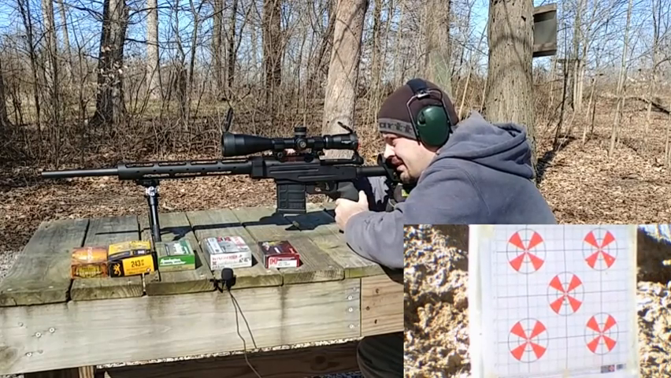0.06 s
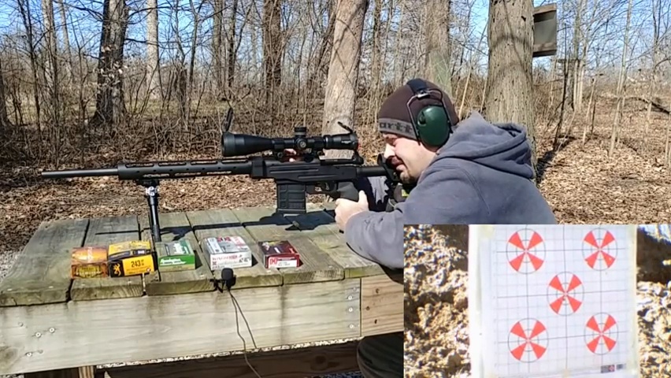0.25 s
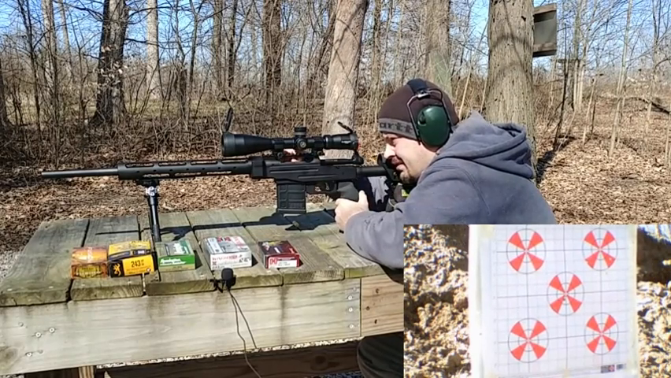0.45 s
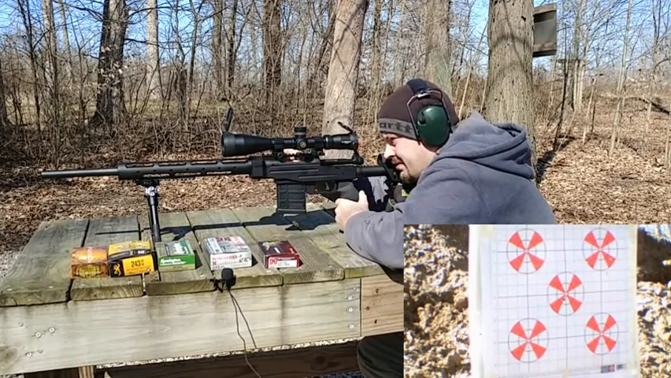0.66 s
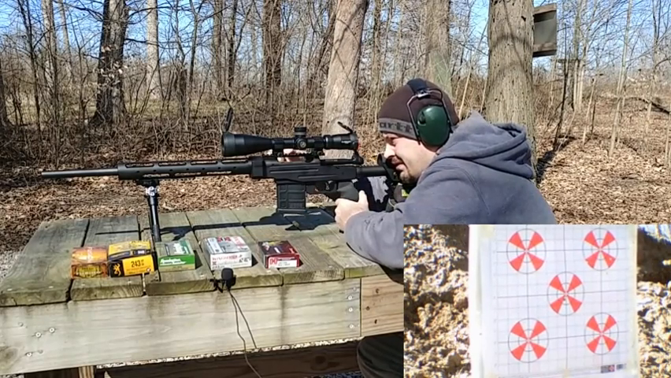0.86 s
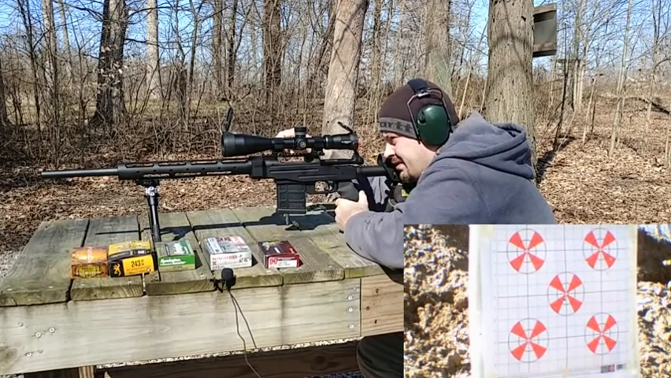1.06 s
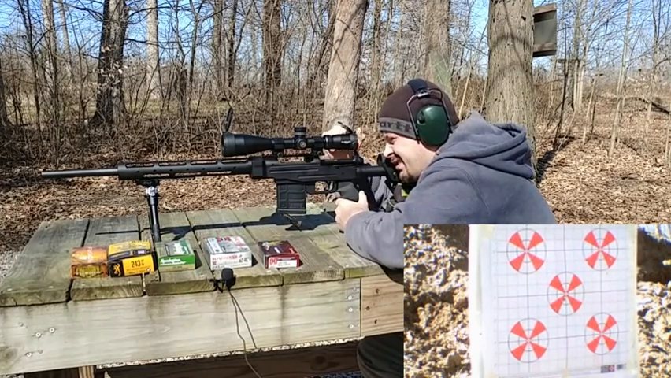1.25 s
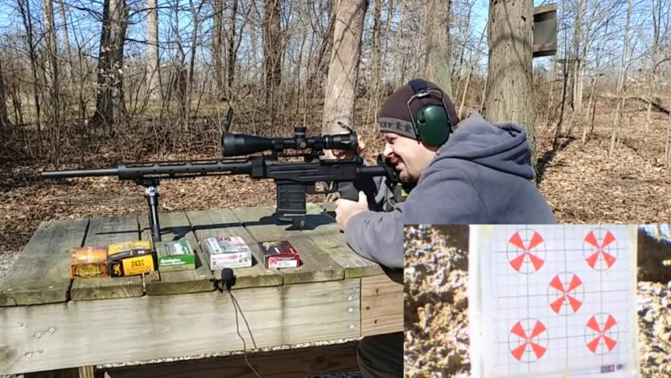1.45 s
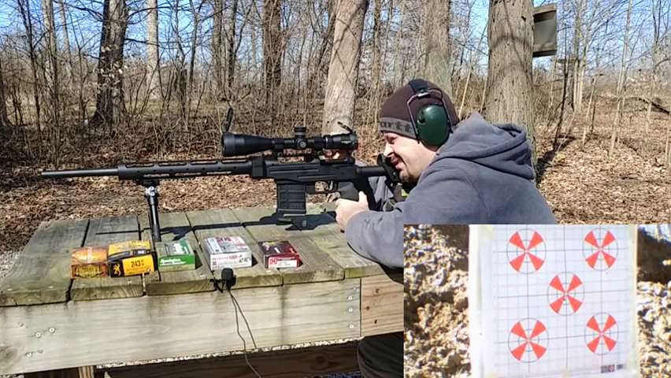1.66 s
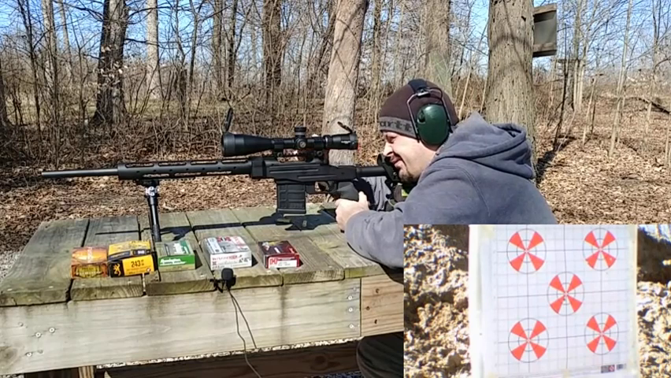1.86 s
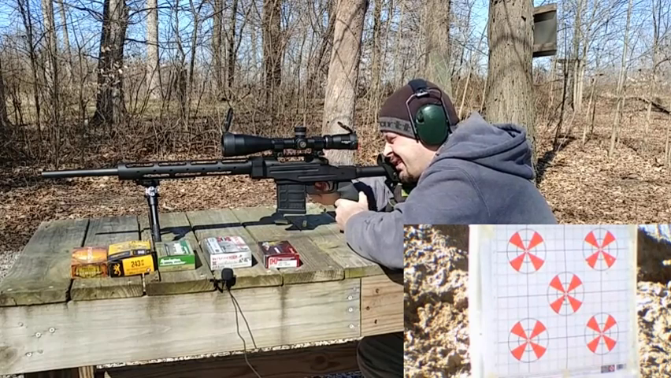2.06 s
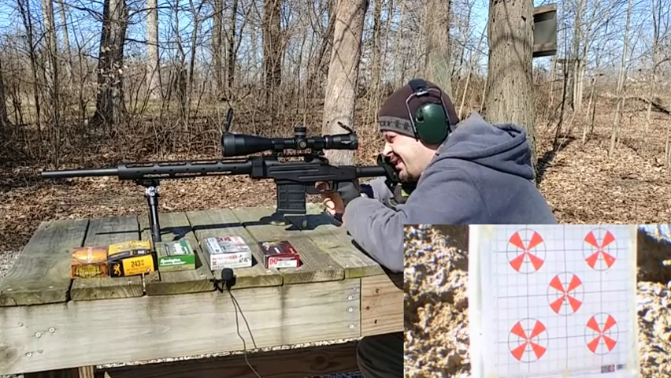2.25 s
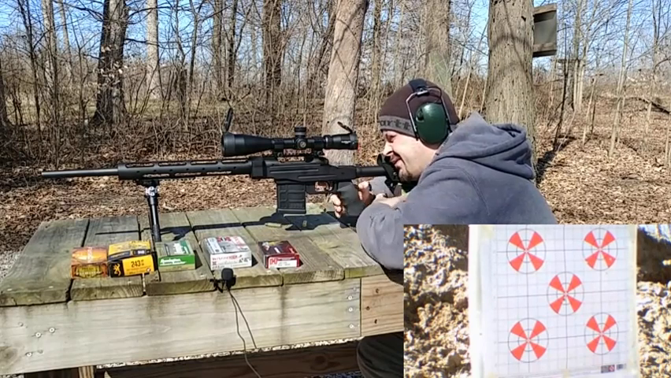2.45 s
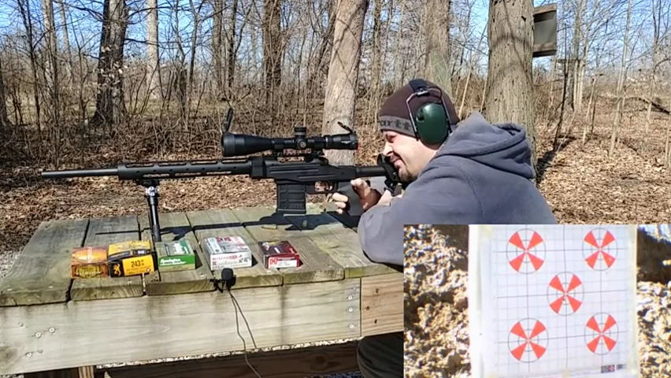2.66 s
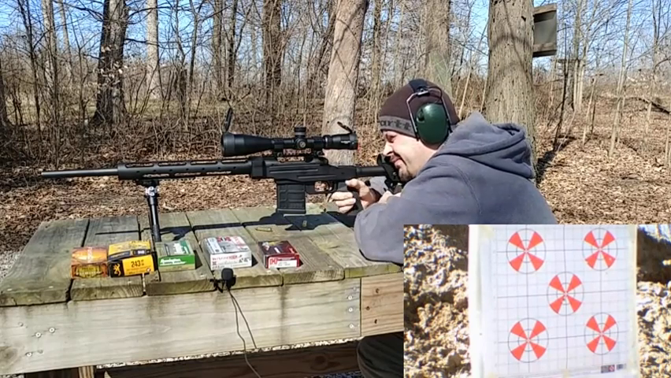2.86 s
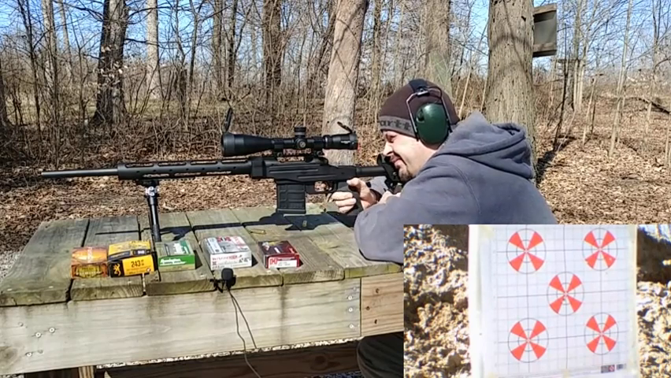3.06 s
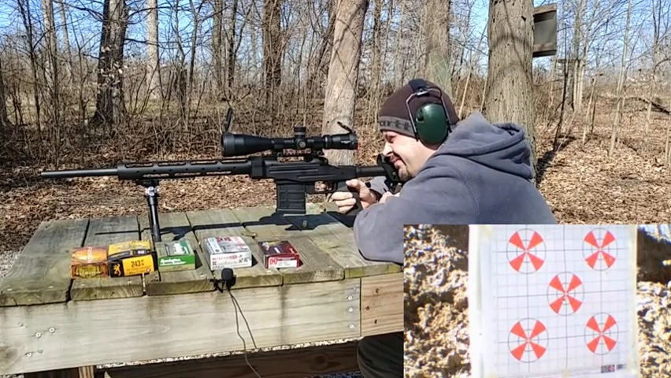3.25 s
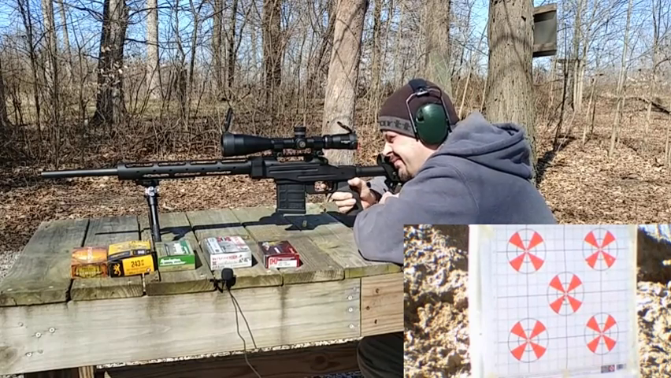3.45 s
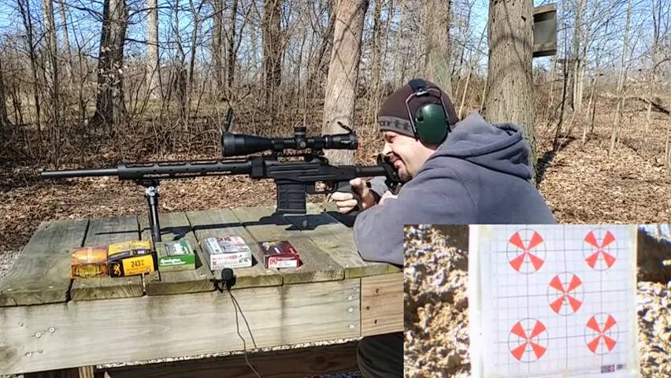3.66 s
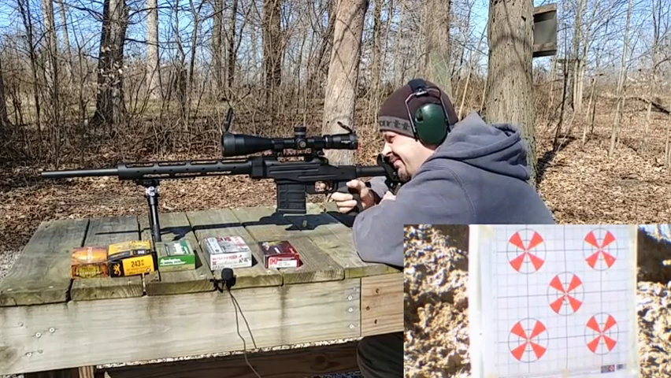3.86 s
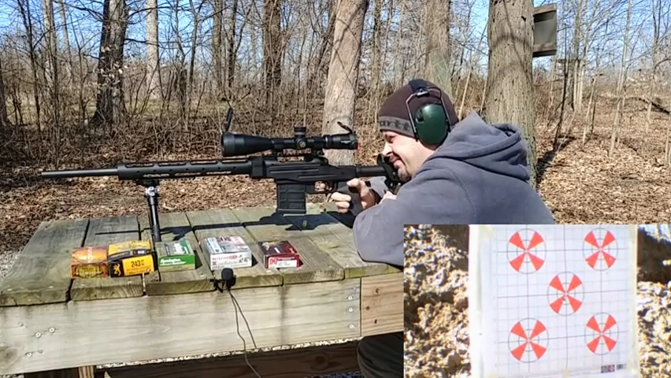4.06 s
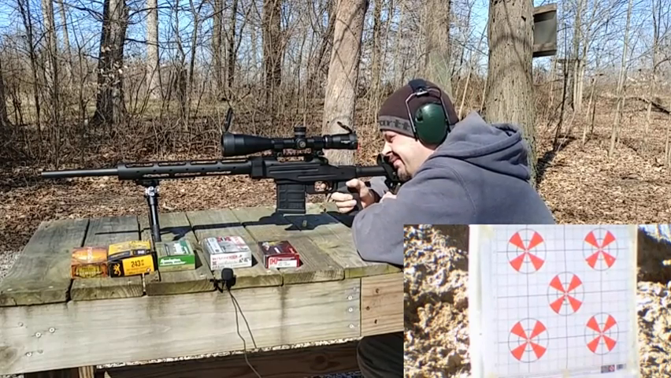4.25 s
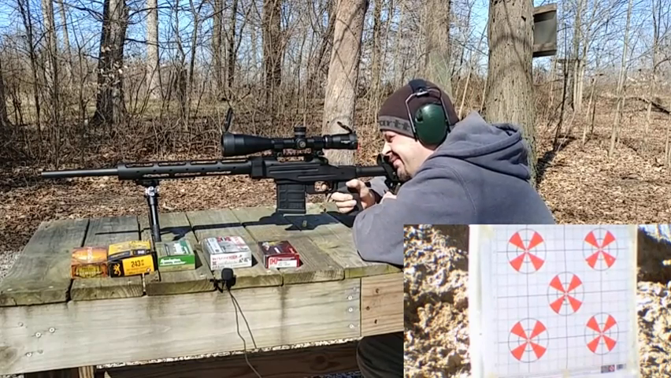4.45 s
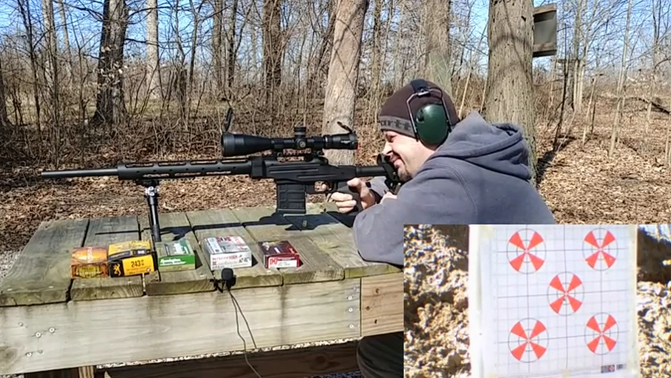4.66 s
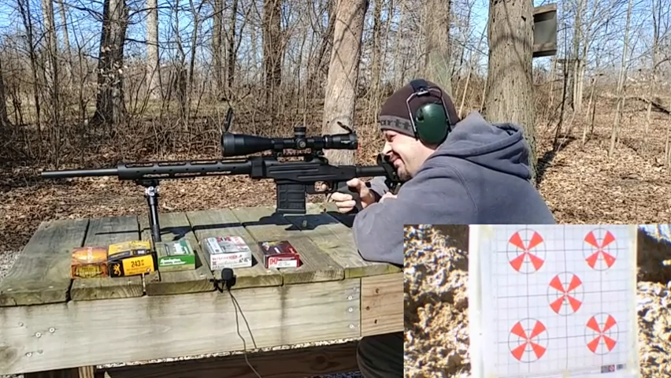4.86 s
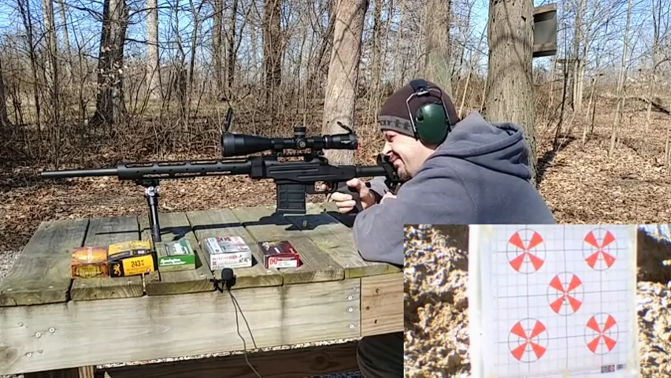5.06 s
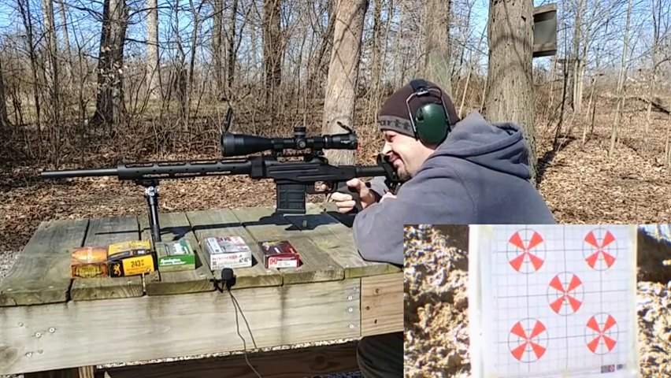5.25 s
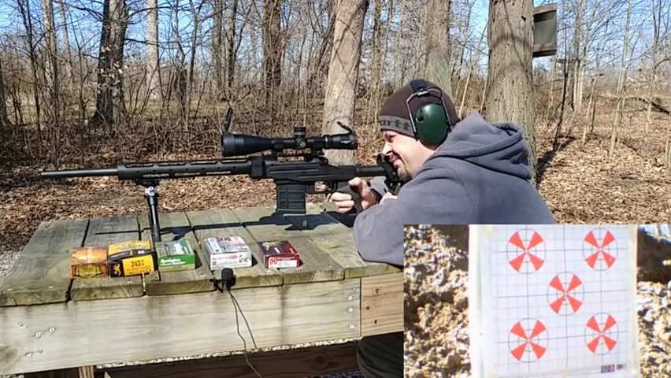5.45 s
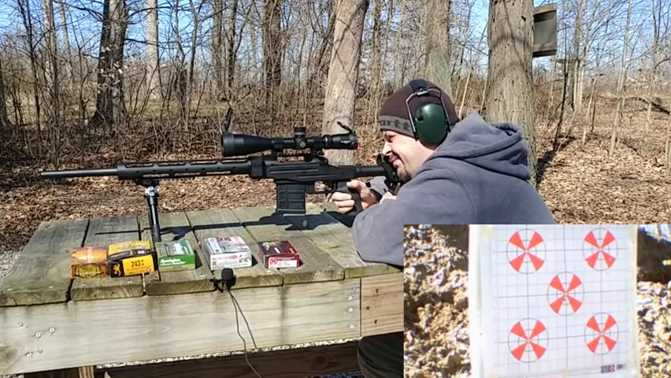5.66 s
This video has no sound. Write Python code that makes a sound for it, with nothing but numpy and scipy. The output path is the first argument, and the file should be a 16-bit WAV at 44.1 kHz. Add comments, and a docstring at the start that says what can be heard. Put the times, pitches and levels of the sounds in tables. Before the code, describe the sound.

Quiet open woods with a low, wavering far engine rumble and very soft air. Tiny metallic ticks occur at the start and around 0.4-0.6 s. At about 0.83 s the rifle bolt clicks open. At 1.1 s an ejected case strikes the wooden bench with a loud hard knock and a brief, very high brass ring, alongside a scrape and low thump; it bounces again at 1.17 and strongly at 1.28 s, then skids and patters away until 1.55 s. From 1.73 to 1.85 s a rapid cluster of bright steel clacks and scraping pushes a round in, followed by light clicks near 1.98 s and a loud, crisp locking snap at 2.07 s. Short bench and shelter reflections and a faint woodland tail follow. Very faint frog trills come at 2.2 and 3.9 s. Soft, dull stock bumps and light rubbing occur from 3 to 4.8 s, strongest near the end, before the rumble continues alone.

```python
"""A rifle bolt is worked at a wooden shooting bench in quiet woods: noisy bursts ring steel resonances.
The bolt clicks open, the spent case bounces on the planks, a round scrapes in and the handle snaps down.
The case adds wooden knocks, rubbing noise and thin brass tones; the rifle then settles with soft knocks.
Low noise and wavering tones make a far engine and bench boom, under open air; a faint frog trills twice.
Fading noise tails give the echoes of the bench, the shelter and the trees."""
import sys
import numpy as np
from scipy import signal
from scipy.fft import rfft, irfft, next_fast_len
from scipy.io import wavfile

SR = 44100
rng = np.random.default_rng(int(sys.argv[2]) if len(sys.argv) > 2 else 0)


def to_wav(sig):
    """Store sig (one row per channel, or 1-D mono) as 16-bit WAV at the path in sys.argv[1].

    Samples outside -1..1 are clipped; the rate is SR.
    """
    pcm = np.clip(np.atleast_2d(sig), -1, 1) * 32767
    pcm = np.round(pcm).astype(np.int16)
    wavfile.write(sys.argv[1], SR, pcm.T)  # frames by channels


N = 251722
TIME = np.arange(N) / SR
BODY_TIME = TIME[:SR // 8]  # length of one blow


def from_db(db):
    """Turn decibels into gain."""
    return 10 ** (np.asarray(db) / 20)


def rms_one(x):
    """Scale a sound to unit power."""
    return x / np.sqrt(np.mean(x ** 2) + 1e-30)


def at_hz(points, hz):
    """Read a table between its points, with pitch spaced as the ear hears it (log scale)."""
    point_hz, value = np.transpose(points)
    return np.interp(np.log(np.maximum(hz, 1)), np.log(point_hz), value)


def colour(x, spectrum):
    """Filter to the given dB spectrum, with the response as early as possible (minimum phase)."""
    size = 2 * next_fast_len(x.shape[-1] // 2 + 2048)
    level_db = at_hz(spectrum, np.fft.rfftfreq(size, 1 / SR))
    # folding the cepstrum forward in time puts the filter's energy first
    cepstrum = irfft(np.log(from_db(level_db)))
    cepstrum[1:size // 2] *= 2
    cepstrum[size // 2 + 1:] = 0
    response = np.exp(rfft(cepstrum))
    return irfft(rfft(x, size) * response)[..., :x.shape[-1]]


# how alike left and right are, for close sounds and for open air: pitch_hz, likeness (1 = identical)
NEAR_LIKENESS = [(100, .97), (900, .95), (2000, .85), (3500, .65), (5200, .05), (14000, 0)]
AIR_LIKENESS = [(60, .93), (250, 0.69), (800, 0.41), (2500, 0.085), (12000, 0.02)]


def stereo_noise(size, likeness):
    """White noise whose two sides are alike in the bass and unrelated in the treble."""
    mid, side = rfft(rng.standard_normal((2, size)))
    alike = np.clip(at_hz(likeness, np.fft.rfftfreq(size, 1 / SR)), -1, 1)
    shared = np.sqrt((1 + alike) / 2) * mid
    opposed = np.sqrt((1 - alike) / 2) * side * [[1], [-1]]
    return irfft(shared + opposed, size)


def drift(rate):
    """A random wander of spread 1 at its turning points, with a new point rate times a second."""
    return np.interp(TIME * rate, np.arange(SR), rng.standard_normal(SR))


def add(out, start_s, sound):
    """Mix a sound in at its start time."""
    start = max(round(start_s * SR), 0)
    out[:, start:start + sound.shape[-1]] += sound[:, :N - start]


def body(modes, spectrum, direct_db):
    """How an object answers a tap: damped resonances plus the dry crack of the contact."""
    click = signal.unit_impulse(len(BODY_TIME))
    out = from_db(direct_db) * click
    for hz, width_hz, db in modes:
        r = np.exp(-np.pi * max(width_hz, 45) / SR)  # a wider resonance dies sooner
        resonator = [1, -2 * r * np.cos(2 * np.pi * hz / SR), r * r]
        ring = signal.lfilter([1, 0, -1], resonator, click)
        out = out + from_db(db) * (1 - r * r) / 2 * ring
    return colour(out, spectrum)[None]


def blows(rows, edges, band_db, response, knee_hz, strike_db, strike_share, span_ms):
    """A hard strike inside a brief chatter rings the body; brightness tilts the bands above the knee."""
    out, ms = np.zeros((2, N)), BODY_TIME * 1000
    bands = [signal.butter(3, pair, "band", fs=SR, output="sos") for pair in zip(edges, edges[1:])]
    centre_hz = np.sqrt(np.multiply(edges[:-1], edges[1:]))
    octaves = np.log2(np.maximum(centre_hz / knee_hz, 1))
    for start_s, blow_db, brightness, chatter_ms in rows:
        levels_db = blow_db + np.array(band_db) + brightness * octaves
        grit = stereo_noise(len(ms), NEAR_LIKENESS)
        strike_at = np.searchsorted(ms, strike_share * chatter_ms)
        strike = rms_one(signal.unit_impulse(len(ms), strike_at))
        for band, high_hz, db in zip(bands, edges[1:], levels_db):
            # lows start later and last longer
            age = ms / (chatter_ms * (5000 / high_hz) ** .15)
            press = (1 - np.exp(-3.5 * age)) ** 2 * np.exp(-age)
            force = rms_one(press * grit) + from_db(strike_db) * strike
            ringing = signal.fftconvolve(force, response, axes=1)[:, :len(ms)]
            ringing = signal.sosfilt(band, ringing)
            # the level counts as if the blow's power were spread over span_ms
            add(out, start_s, from_db(db) * rms_one(ringing) * np.sqrt(span_ms / ms[-1]))
    return out


def pressure(rubs, rise_db_per_s, fall_db_per_s):
    """Gain of rubs (start_s, end_s, level_db, swell_db): each rises, swells or sinks, then falls away."""
    levels = []
    for start, end, db, swell in rubs:
        times = [start - 1, start, end, end + 1]
        points_db = [db - rise_db_per_s, db, db + swell, db + swell - fall_db_per_s]
        levels.append(np.interp(TIME, times, points_db))
    return from_db(np.max(levels, axis=0))  # the strongest rub wins


def friction(gain, response, grain_db, slips_per_s):
    """A rub is a stream of uneven slips that ring the body."""
    force = stereo_noise(N, NEAR_LIKENESS) * from_db(grain_db * drift(slips_per_s))
    return rms_one(signal.oaconvolve(force, response, axes=1)[:, :N]) * gain


# low-end loudness curve: time_s, level_db
# far engine rumble, swelled by the low boom of the bench knocks around 1.1-1.9 s
LOW_END = [(0.0, -60), (0.52, -61.5), (1.11, -58), (1.24, -50.5), (2.69, -59), (4.77, -55.5), (5.05, -58.5),
           (5.71, -52)]
# steady tones in the engine's hum, against each other: pitch_hz, level_db
HUM = [(59.2, -64.5), (96.9, -66), (145.3, -67.5), (177.6, -64), (204.6, -79), (296.1, -74.5)]
# colour of the low end and the open air: pitch_hz, level_db
AIR = [(15, -50.5), (25, -23), (41, -11.5), (64, 1.5), (145, -8), (185, -10.5), (236, -18), (301, -22),
       (439, -30), (641, -28.5), (734, -30.5), (1020, -35.5), (1610, -39), (16000, -47)]


def background(low_trim_db, air_db, hum_db, hum_follows, waver):
    """Low noise for engine rumble and bench boom, wavering hum tones, and a soft wash of open air."""
    low_end_db = np.interp(TIME, *np.transpose(LOW_END))
    noise = colour(stereo_noise(N, AIR_LIKENESS), AIR)
    # split at 280 Hz: low end below, air above
    low, high = [rms_one(signal.sosfilt(signal.butter(3, 280, kind, fs=SR, output="sos"), noise))
                 for kind in ("low", "high")]
    hum = 0
    for hz, db in HUM:
        strength = from_db(db + hum_db + 2.1 * drift(10))
        hum = hum + strength * np.sin(2 * np.pi * hz * TIME + waver * drift(5.6))
    low_end = low * from_db(low_end_db + low_trim_db)
    air = high * from_db(air_db)
    # the hum partly follows the low-end curve
    return low_end + air + hum * from_db(hum_follows * (low_end_db - low_end_db.mean()))


def rattles(rows, rattle_db):
    """One brief rub for each blow; bright blows rattle more."""
    return [(s, s, db + 2 * brightness + rattle_db, 0) for s, db, brightness, _ in rows]


# the bolt slides, stops and feeds a round: start_s, level_db, brightness_db_per_octave, chatter_ms
CLICKS = [(0.007, -55, 0.5, 2.6), (0.017, -54.5, -2, 2.8), (0.395, -62.5, -3.5, 3), (0.618, -65, -0.5, 2.4),
          (0.832, -42, -3, 4.5), (1.733, -47.5, 2.74, 1.9), (1.784, -36.5, -1, 2.8),
          (1.791, -29.5, -2.5, 2.8), (1.8, -28, 2.5, 4), (1.808, -28.5, -1.3, 1.9), (1.834, -31, -3, 3.4),
          (1.847, -22.5, -0.26, 3.2), (1.978, -45.5, 1.2, 3.5), (1.985, -45.5, 2.35, 3),
          (2.078, -28, -6, 4)]
# the locking lugs snap open and shut: start_s, level_db, brightness_db_per_octave, chatter_ms
LOCKS = [(0.864, -56, 9, 1), (2.074, -18.5, 0, 1.6)]
# strokes of the bolt, steel on steel: start_s, end_s, level_db, swell_db
STROKES = [(0.005, 0.033, -54, 2), (0.575, 0.63, -68.5, 7), (0.819, 0.86, -51.5, -4), (1.1, 1.22, -37, -26),
           (1.74, 1.78, -42.5, 5), (1.79, 1.85, -24, -4.5), (1.87, 1.96, -45.5, -14),
           (1.99, 2.068, -50.5, -0.5)]
# edges of the pitch bands: edge_hz; then what a click and a snap add in each band: level_db
STEEL_BANDS = [120, 600, 1400, 4200, 6800, 16000]
CLICK_BAND_DB = [-9, -1, 6, 6, 4.5]
LUG_BAND_DB = [-10, 0, 3.5, 10, -2.5]
# resonances of the steel action and of the lugs: pitch_hz, width_hz (below 45 plays as 45), level_db
STEEL_MODES = [(1660, 28, -4), (2740, 420, -1), (2880, 27, -1), (3290, 25, 2.5), (3450, 60, 2.5),
               (3940, 30, 1.5), (4841, 200, -3), (5570, 31, -9), (5650, 250, -8), (5750, 79, -9.5),
               (8000, 140, -4), (8800, 160, 1), (7600, 85, -4.5), (8800, 360, -8.5)]
LUG_MODES = [(850, 68, -1), (1130, 29, -1), (2780, 710, 0.5), (3100, 230, -4.5), (5020, 160, -4),
             (5150, 110, -3), (6100, 100, 1.5), (8150, 750, -4.5)]
# colours of the action and of the lugs: pitch_hz, level_db
STEEL = [(71, -52.5), (120, -11), (557, -8.5), (839, 1), (2020, -6.5), (2640, -2.5), (4500, -7.5),
         (8310, -8.5), (16000, -30)]
LUG = [(120, -18.5), (600, -20.5), (950, -3), (1500, -7), (2100, -13.5), (2900, -5), (4000, -8), (5200, -2),
       (6800, -19), (8500, -8.5), (11000, -31), (16000, -34.5)]


def bolt():
    """Steel strikes, rattles and slides on steel; the lugs snap with a ring of their own."""
    action = body(STEEL_MODES, STEEL, direct_db=-2)
    lugs = body(LUG_MODES, LUG, direct_db=-2)
    clicks = blows(CLICKS, STEEL_BANDS, CLICK_BAND_DB, action, knee_hz=1000,
                   strike_db=-11.5, strike_share=0.64, span_ms=5.1)
    snaps = blows(LOCKS, STEEL_BANDS, LUG_BAND_DB, lugs, knee_hz=1000,
                  strike_db=0.5, strike_share=1.3, span_ms=8)
    sliding = pressure(STROKES, rise_db_per_s=3499, fall_db_per_s=547.5)
    # the parts rattle on after every click and snap
    rattle_rubs = rattles(CLICKS, rattle_db=0) + rattles(LOCKS, rattle_db=-4.5)
    rattling = pressure(rattle_rubs, rise_db_per_s=7000.5, fall_db_per_s=750)
    rub_gain = np.hypot(sliding, rattling)
    return clicks + snaps + friction(rub_gain, action, grain_db=2.5, slips_per_s=600)


# the spent case bounces on the bench: start_s, level_db, brightness_db_per_octave, chatter_ms
KNOCKS = [(1.095, -15, 2, 4.6), (1.171, -34.5, -2, 4), (1.244, -50, -3.5, 4), (1.283, -20, 0, 4.78),
          (1.341, -33.5, -11.5, 4), (1.368, -41, -10.5, 6.5), (1.388, -46, -10, 2.3), (1.427, -30, -6, 5.3),
          (1.485, -29.5, -4.5, 5.5), (1.532, -44.5, -5.5, 4.4), (1.548, -48, -6, 3.6)]
# edges of the pitch bands: edge_hz; then what a knock adds in each band: level_db
WOOD_BANDS = [80, 600, 2200, 4300, 10000]
KNOCK_BAND_DB = [-9.5, -1.5, -7, -22]
# resonances of the planks: pitch_hz, width_hz (below 45 plays as 45), level_db
WOOD_MODES = [(394, 17, -5), (947, 65, -4), (1214, 58, 1.5), (1460, 15, -5), (1920, 69, -11.5),
              (2160, 140, -7), (2930, 19, -3.5), (3050, 43, -7.5), (3150, 110, -5), (3430, 120, -11.5),
              (3620, 84, 2), (4030, 33, -12.5)]
# colour of the planks: pitch_hz, level_db
WOOD = [(47, -45.5), (80, -14.5), (381, -8.5), (703, -9), (927, -3.5), (1610, -7.5), (1780, -1.5),
        (2000, -11.5), (3770, -26.5), (9000, -38.5), (11700, -71.5), (19800, -120)]
# blows that set the case ringing: start_s, level_db
CASE_HITS = [(1.096, -32.5), (1.172, -42), (1.285, -58), (1.428, -60.5)]
# thin ring of the brass case: pitch_hz, level_db, fade_s (time to drop 60 dB)
CASE_MODES = [(9980, -4, 0.12), (14100, -3, 0.26), (14750, -4, .16)]


def spent_case():
    """The case knocks and skids on the planks, and its brass rings high and thin."""
    bench = body(WOOD_MODES, WOOD, direct_db=-5)
    out = blows(KNOCKS, WOOD_BANDS, KNOCK_BAND_DB, bench, knee_hz=1200,
                strike_db=-14, strike_share=1, span_ms=11)
    # after each bounce the case tips over and skids; harder bounces skid louder
    skid_delay_s, skid_db, skid_follows = .022, -33, .55
    skids = [(s + skid_delay_s, s + skid_delay_s, skid_db + skid_follows * db, 0) for s, db, *_ in KNOCKS]
    skid_gain = pressure(skids, rise_db_per_s=2000, fall_db_per_s=480)
    out += friction(skid_gain, bench, grain_db=6, slips_per_s=100)
    t = TIME[:SR // 2]
    for start_s, hit_db in CASE_HITS:
        for hz, db, fade_s in CASE_MODES:
            phase = rng.uniform(0, 2 * np.pi, (2, 1))
            fade = np.exp(-np.log(1000) * t / fade_s) * (1 - np.exp(-t / .001))
            tone = np.sin(2 * np.pi * hz * t + phase + 0.99 * drift(200)[:len(t)])
            add(out, start_s, from_db(hit_db + db) * fade * tone)
    return out


# the push on the bolt rocks the rifle on its rest: start_s, level_db, pitch_hz, decay_ms
ROCKING = [(1.104, -36.5, 100, 22), (1.751, -36.5, 202, 8.8), (2.076, -31, 195, 4.7)]


def rocking():
    """The whole rifle gives a short low thump on its rest: a tone that swells and dies away."""
    out, t = np.zeros((2, N)), TIME[:SR // 4]
    for start_s, db, hz, decay_ms in ROCKING:
        age = t * 1000 / decay_ms
        swell = age * np.exp(1 - age)  # peaks at 1
        add(out, start_s, from_db(db) * swell * np.sin(2 * np.pi * hz * t) * np.ones((2, 1)))
    return out


# frog calls: start_s, end_s, level_db
TRILLS = [(2.182, 2.525, -79), (3.877, 4.262, -79)]


def frog(pulses_per_s, start_hz, end_hz, width_hz):
    """A far trill: narrow pulses that climb in pitch, blurred by the trees."""
    out = np.zeros((2, N))
    for start, end, db in TRILLS:
        t = TIME[:round((end - start) * SR)]
        slow = signal.butter(2, width_hz, fs=SR, output="sos")
        blur = signal.sosfilt(slow, rng.standard_normal((2, len(t))))
        tone = np.sin(2 * np.pi * np.cumsum(np.linspace(start_hz, end_hz, len(t))) / SR)
        pulses = 0.25 + np.sin(np.pi * pulses_per_s * t) ** 2
        pulses = pulses * signal.windows.tukey(len(t), .3)  # soft start and end
        add(out, start, from_db(db) * rms_one(blur * tone * pulses))
    return out


# the stock settles: start_s, level_db, brightness_db_per_octave, chatter_ms
THUDS = [(2.964, -71.5, 4.5, 7.6), (3.05, -75, 4.5, 10.3), (3.477, -60, 1, 12), (3.658, -70, 1.5, 8.1),
         (3.814, -62, 3, 10.2), (3.867, -55.5, 4, 8.76), (3.933, -60.5, -3.5, 8), (4.202, -55.5, -9, 11),
         (4.237, -51.5, -0.5, 8), (4.332, -57.5, -3, 4.2), (4.35, -53.5, -1.5, 7.2),
         (4.48, -58.5, -16, 9.6), (4.764, -45.5, 0.5, 8.2), (4.794, -51, -0.5, 7.1)]
# edges of the pitch bands: edge_hz; then what a thud adds in each band: level_db
STOCK_BANDS = [300, 700, 3200]
THUD_BAND_DB = [-0.5, -3.5]
# resonances of the stock: pitch_hz, width_hz (below 45 plays as 45), level_db
STOCK_MODES = [(417, 54, 7), (1033, 140, -6), (1340, 78, -4), (1640, 14, -10.5), (2210, 110, -28),
               (2637, 70, -25.5)]
# colour of the stock: pitch_hz, level_db
STOCK = [(200, -13), (420, 2.5), (560, 1), (750, 12), (1300, -1.5), (2500, -8.5), (5000, -13)]
# hand and sleeve rest on the stock: start_s, end_s, level_db, swell_db
GRIP = (3, 5, -77, 1.5)


def handling():
    """The stock is nudged and rubbed as the shooter settles."""
    stock = body(STOCK_MODES, STOCK, direct_db=-18)
    thuds = blows(THUDS, STOCK_BANDS, THUD_BAND_DB, stock, knee_hz=500,
                  strike_db=-2, strike_share=0.284, span_ms=12.4)
    # hand and sleeve drag harder around each thud
    drag_db = -20  # against the thud
    rubs = [GRIP] + [(s, s, db + drag_db, 0) for s, db, *_ in THUDS]
    rub_gain = pressure(rubs, rise_db_per_s=301, fall_db_per_s=153)
    return thuds + friction(rub_gain, stock, grain_db=4.5, slips_per_s=71)


def echo(x, spectrum, t60, onset_s):
    """Many small reflections that build up and die away, by 60 dB in t60 seconds."""
    t = TIME[:SR * 3 // 2]
    build_up = 1 - np.exp(-(t / onset_s) ** 2)
    tail = stereo_noise(len(t), AIR_LIKENESS) * build_up * np.exp(-np.log(1000) * t / t60)
    response = colour(rms_one(tail) / np.sqrt(len(t)), spectrum)
    return signal.fftconvolve(x, response, axes=1)[:, :N]


# how much louder the left side is made than the right: pitch_hz, left_minus_right_db
LEAN = [(200, 0.5), (800, 2), (1800, -1), (3200, -1), (5200, -3.5), (8500, 3), (14000, -5.5)]
# scatter from bench and shelter: pitch_hz, level_db
NEAR_ECHO = [(100, -11), (350, -4.5), (1000, -14), (1700, -15.5), (3000, -16.5), (5500, -15.5),
             (9000, -13.5), (14000, -20.5)]
# echo from the trees: pitch_hz, level_db
TREE_ECHO = [(100, -18.5), (500, -20.5), (1100, -30), (1700, -30.5), (2800, -31.5), (5000, -43.5),
             (14000, -48.5)]


def scene():
    """Rifle and bench close by, their echoes, and the woods behind."""
    left, right = bolt() + spent_case() + handling() + rocking()
    right = np.roll(right, 2)  # the right microphone hears the rifle 2 samples later
    left_lean = [(hz, db / 2) for hz, db in LEAN]
    right_lean = [(hz, -db / 2) for hz, db in LEAN]
    near = np.array([colour(left, left_lean), colour(right, right_lean)])
    bench_echo = echo(near, NEAR_ECHO, t60=0.18, onset_s=0.0027)
    tree_echo = echo(near, TREE_ECHO, t60=1.6, onset_s=0.02)
    behind = background(low_trim_db=-1, air_db=-67, hum_db=2.5, hum_follows=.4, waver=0.28)
    trills = frog(pulses_per_s=26, start_hz=2880, end_hz=3200, width_hz=120)
    return near + bench_echo + tree_echo + behind + trills


def record(dry):
    """Peaks beyond 0.82 are clipped flat as an overload, then the top of the treble is cut."""
    top_cut = signal.cheby2(18, 75, 16900, fs=SR, output="sos")  # 75 dB down from 16900 Hz up
    return signal.sosfilt(top_cut, np.clip(dry, -.82, .82))


dry = scene()
out = record(dry)
to_wav(out)
```